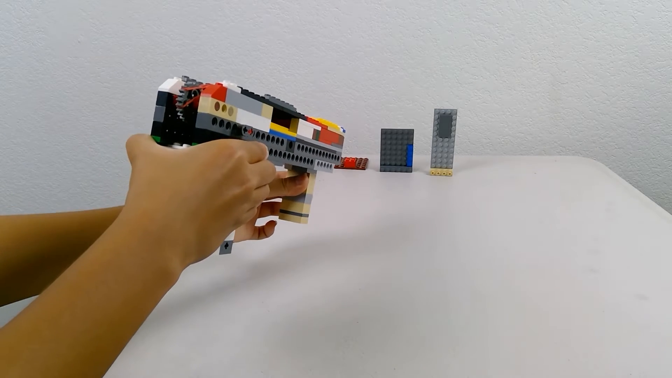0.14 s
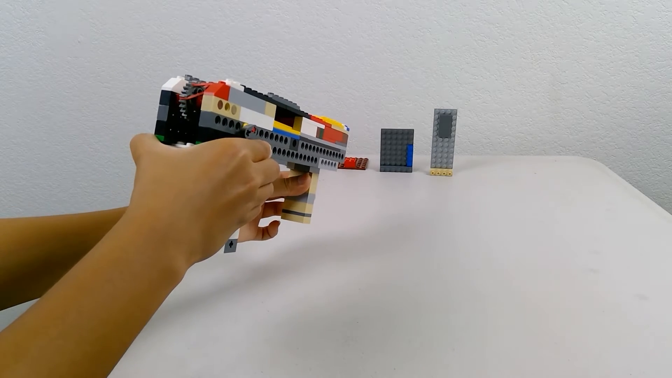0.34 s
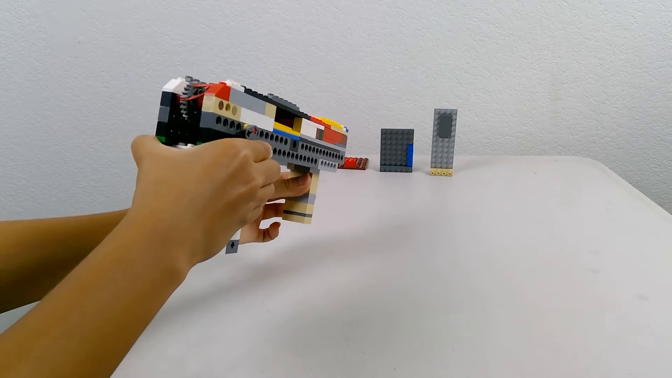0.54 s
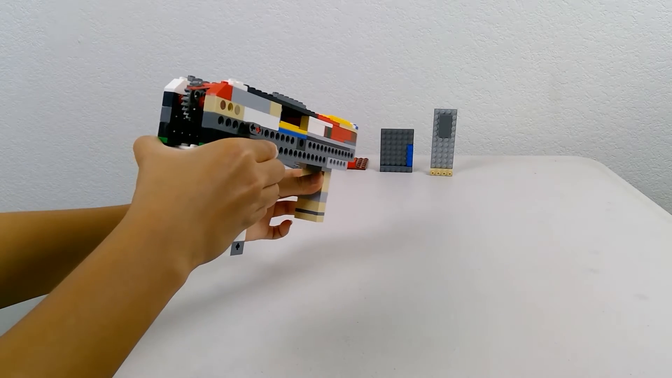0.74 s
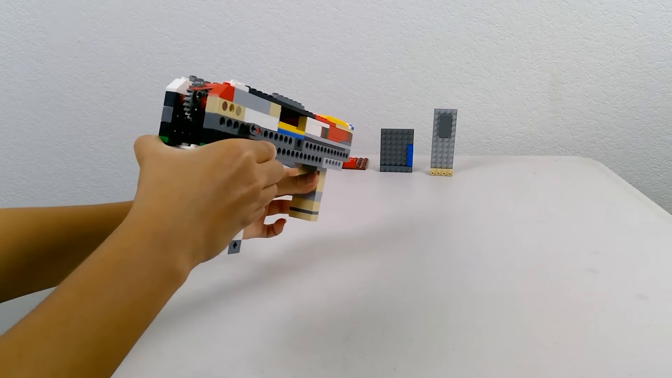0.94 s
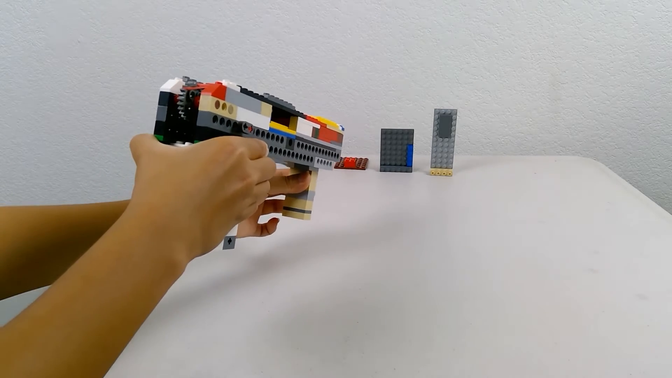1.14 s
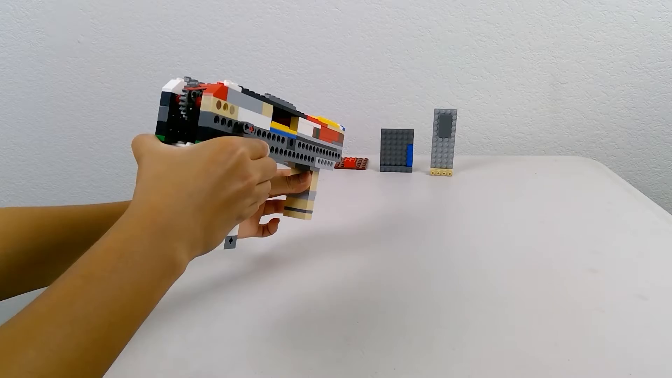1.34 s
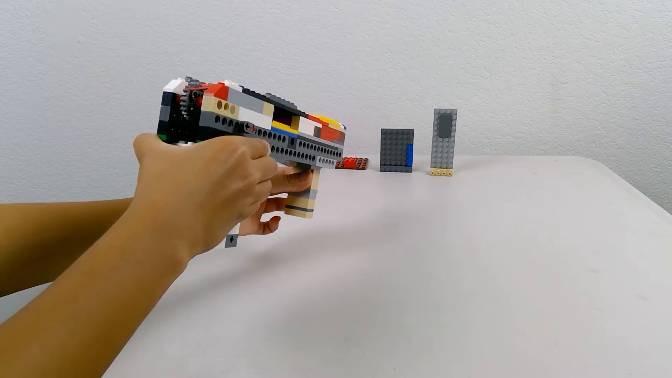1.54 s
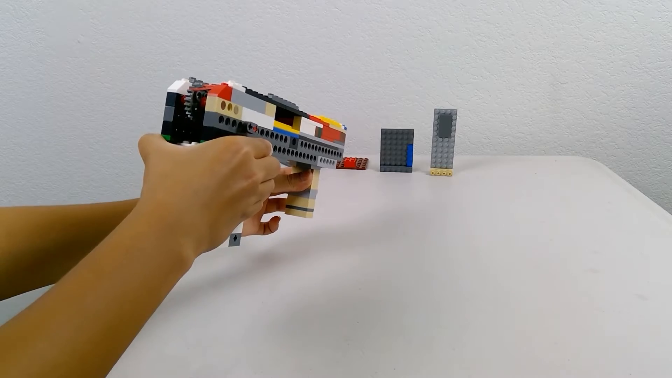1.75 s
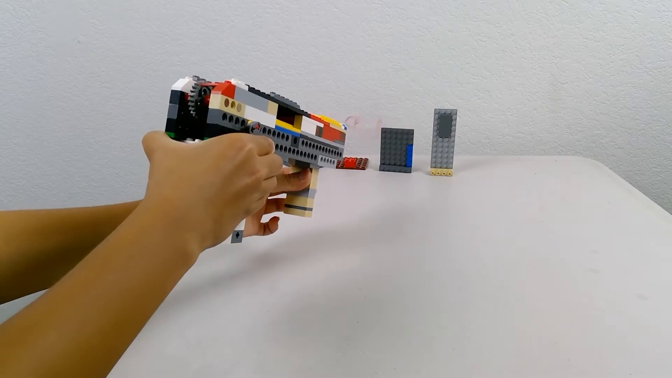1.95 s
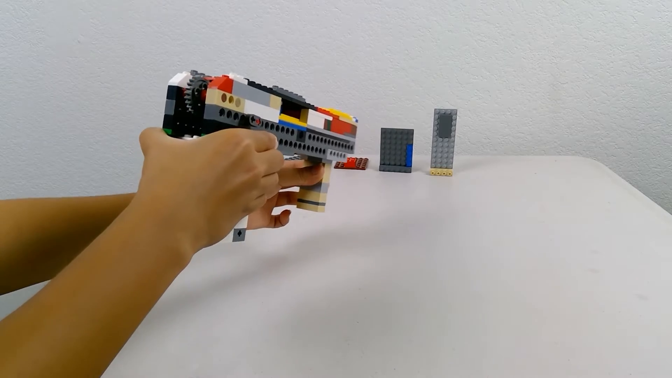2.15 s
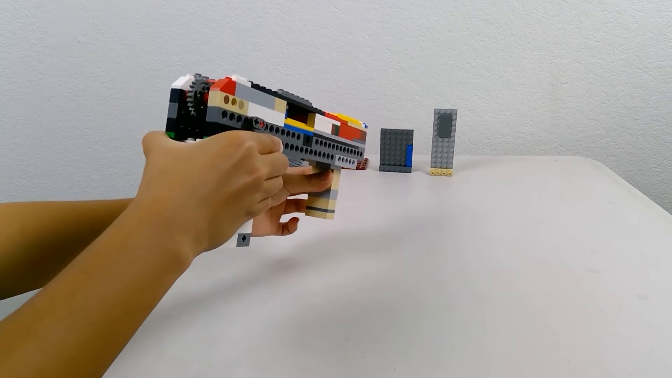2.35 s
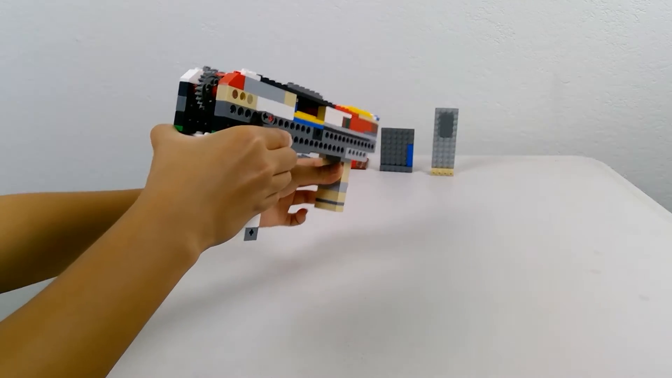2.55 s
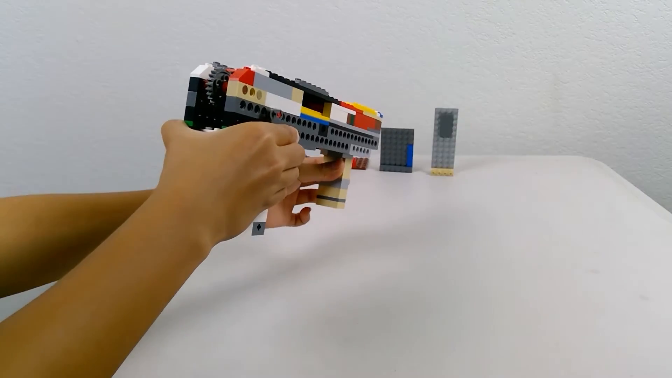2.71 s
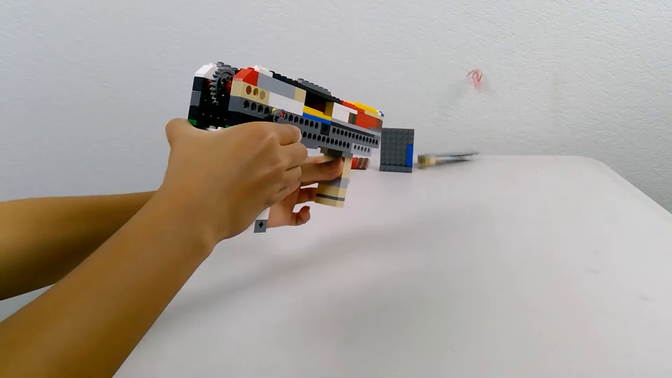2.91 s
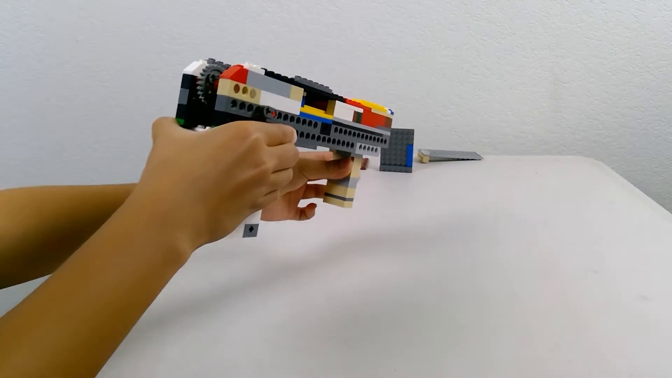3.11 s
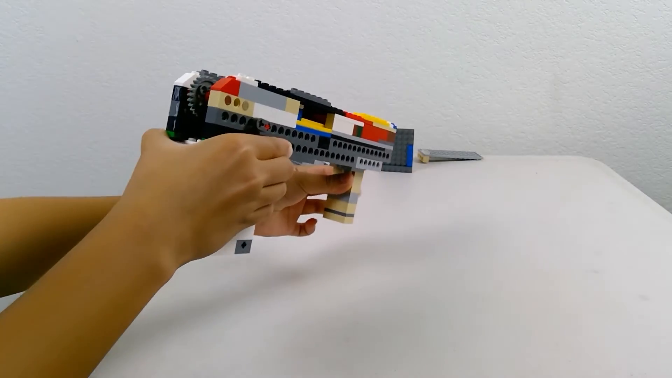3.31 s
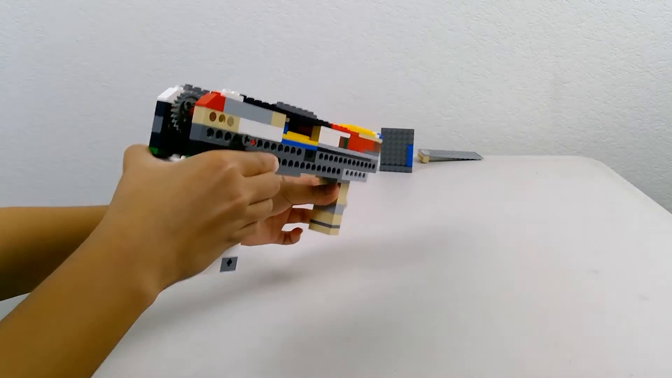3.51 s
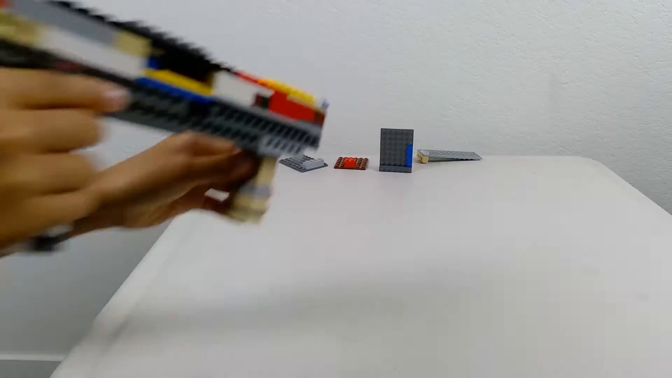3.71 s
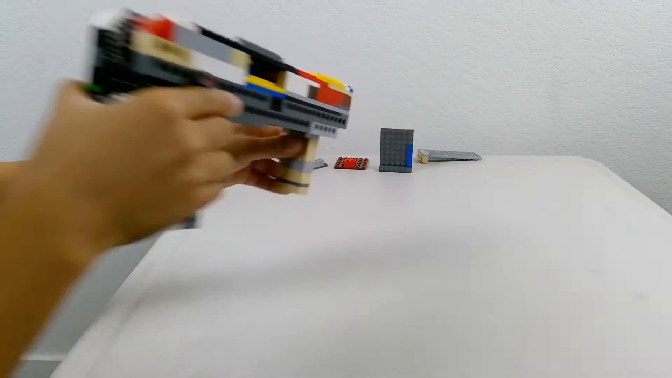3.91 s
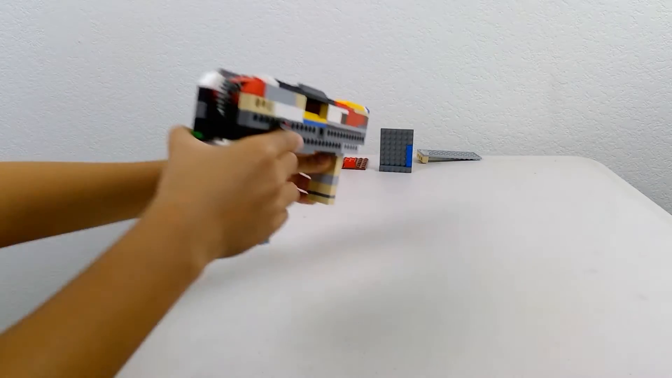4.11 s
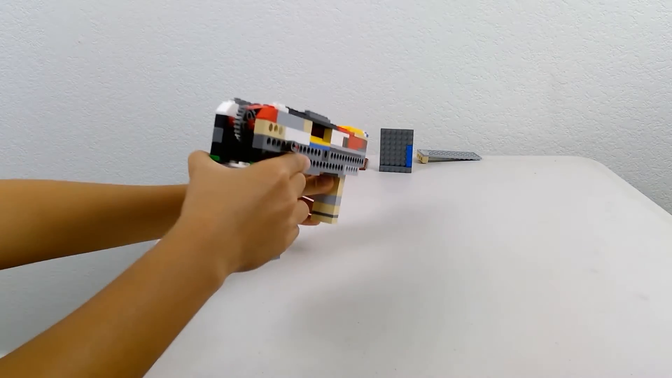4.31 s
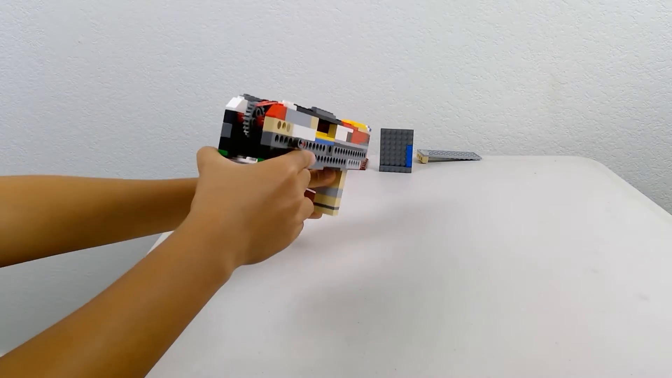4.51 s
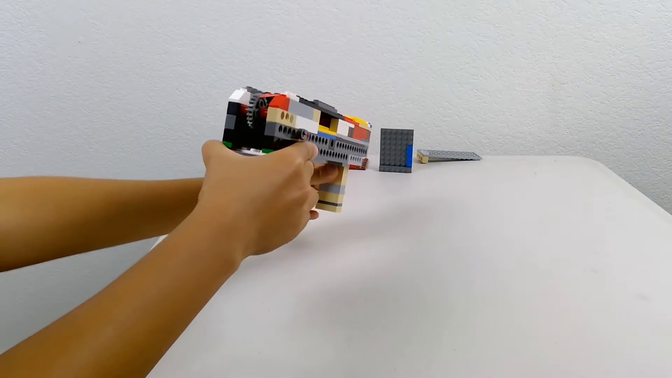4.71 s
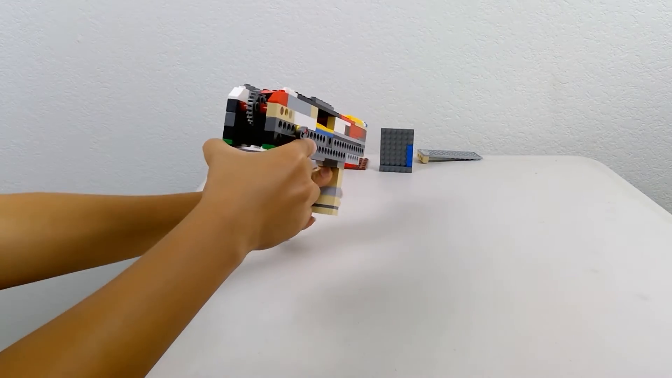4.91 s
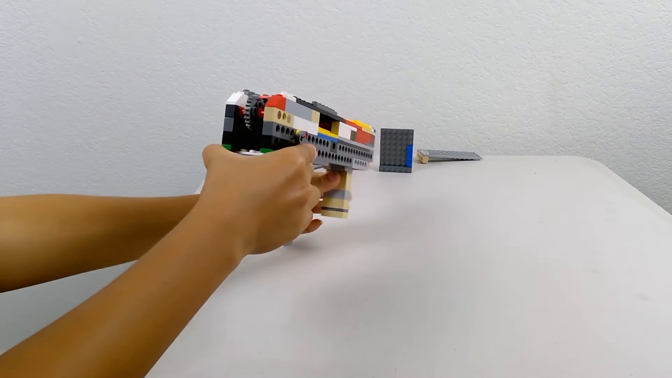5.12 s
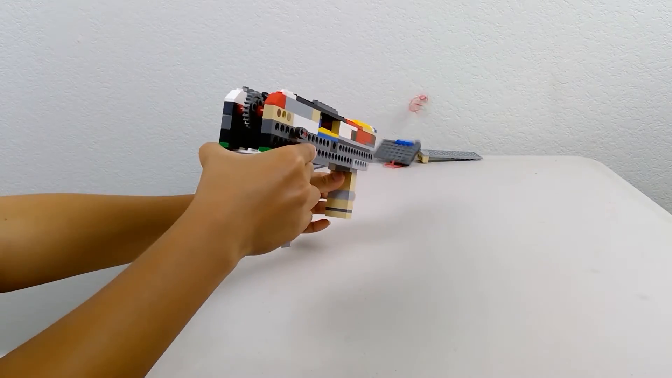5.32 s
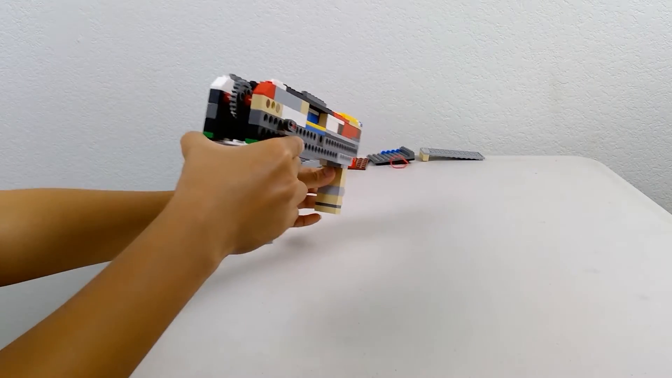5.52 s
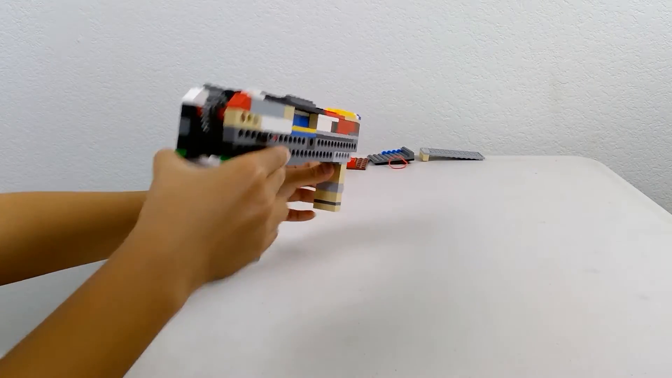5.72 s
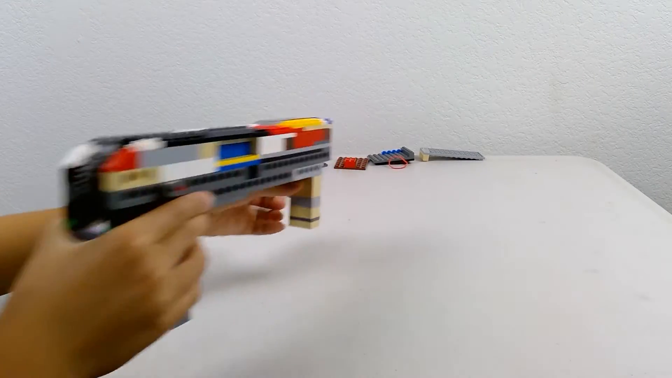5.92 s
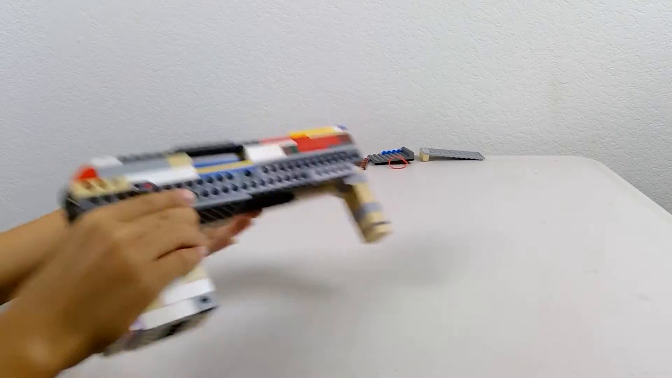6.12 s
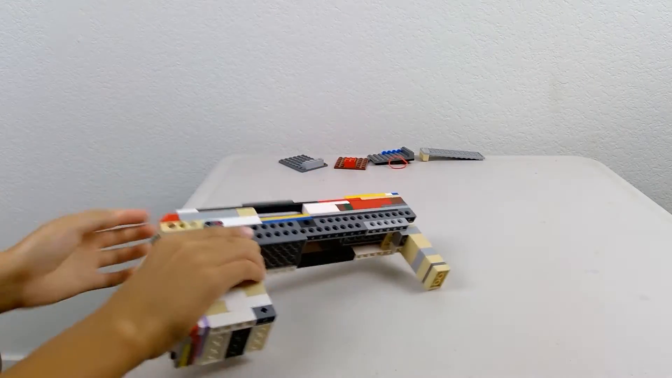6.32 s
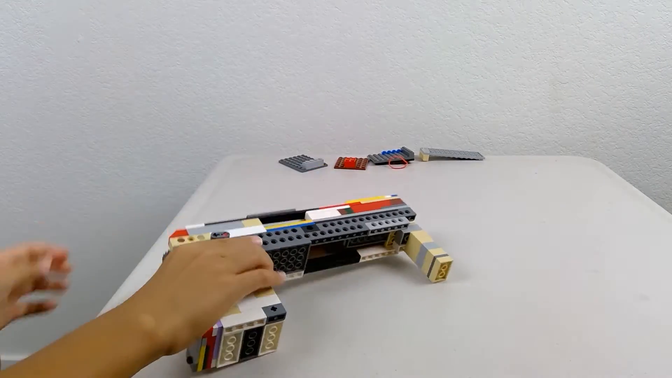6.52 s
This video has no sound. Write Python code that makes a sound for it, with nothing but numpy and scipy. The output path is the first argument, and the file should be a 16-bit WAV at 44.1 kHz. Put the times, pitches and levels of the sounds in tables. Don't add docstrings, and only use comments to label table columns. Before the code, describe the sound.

Dry, bright plastic snaps sit slightly right of the microphone, with short room echoes. Cocking clacks and trigger clicks lead to the loudest sound, a hard brick target hitting the tabletop and rattling to rest. Near silence follows with faint ticks, then two more clicks and a denser wobbling clatter. Finally there is a muted plastic thump as the toy is put down. Low rumble swells after the blows.

```python
import sys
import numpy as np
from scipy import signal
from scipy.fft import rfft, irfft
from scipy.io import wavfile

SR = 44100
rng = np.random.default_rng(int(sys.argv[2]) if len(sys.argv) > 2 else 0)


def ratio(d):
    e = np.asarray(d, float) / 20
    return 10 ** e


def inscribe(sig):
    pcm = np.round(np.clip(np.atleast_2d(sig).T, -1, 1) * 32767)
    wavfile.write(sys.argv[1], SR, pcm.astype(np.int16))


N = 288842
LEAD = SR // 50


def cut(x, hz, kind, order=4):
    return signal.sosfilt(signal.butter(order, hz, kind, fs=SR, output="sos"), x)


def band(x, lo_hz, hi_hz):
    y = cut(x, [lo_hz, min(hi_hz, 0.45 * SR)], "band", order=3)
    return y / np.std(y)


def colour(x, points, delay_s=0.0):
    hz = np.fft.rfftfreq(x.shape[-1], 1 / SR)
    point_hz, db = np.transpose(points)
    gain = ratio(np.interp(np.log(hz + 1), np.log(point_hz), db))
    delay = np.exp(-2j * np.pi * hz * delay_s)
    return irfft(rfft(x) * gain * delay, x.shape[-1])


def peak(pair, db):
    return pair * ratio(db) / np.max(np.abs(pair[0]))


def add(track, s, sound):
    i = int(s * SR) - LEAD
    track[..., i:i + sound.shape[-1]] += sound[..., :track.shape[-1] - i]


def opening(x):
    open_s, close_s = 0.065, 0.12
    follow = 0.87
    t = np.arange(SR) / SR
    memory = np.exp(-2 * t / close_s) * (1 - np.exp(-t / open_s)) ** 2
    power = np.abs(signal.fftconvolve(x ** 2, memory)[:N])
    return (power / power.max()) ** (follow / 2)


# (frequency [Hz], density [dB per Hz])
AIR_SPECTRUM = [(47, -40), (80, -6), (157, -13.5), (397, -16), (520, -23.5), (1970, -39.5), (10300, -61),
                (11500, -91)]
# (time [s], level [dB])
HUM_LEVEL = [(0, -62.5), (1.2, -71), (2.7, -70), (3.6, -60), (6.55, -59)]
# (time [s], level [dB], length [s])
SLEEVE_BRUSHES = [
    (2.03, -58.5, .08),
    (4.24, -69, 0.03),
]


def floor(near, far):
    mains_hz, hum_width_hz, boom_hz = 59, 7, 400
    t = np.arange(N) / SR
    held, struck = opening(near), opening(far)
    boom = opening(cut(far, boom_hz, "low"))
    noise = rng.standard_normal((5, N))
    sides = np.array([[1], [-1]])

    rumble = band(cut(noise[0] + 0.2 * sides * noise[1], 28, "high"), 31, 45)
    rumble_gain = ratio(-61.5) + ratio(-49.5) * held + ratio(-41.5) * struck

    waver = band(noise[2] + 0.14 * sides * noise[1], mains_hz - hum_width_hz, mains_hz + hum_width_hz)
    hum = 0.85 * np.sin(2 * np.pi * mains_hz * t) + 0.55 * waver
    hum_gain = ratio(np.interp(t, *np.transpose(HUM_LEVEL)))
    hum_gain = hum_gain + ratio(-59) * held + ratio(-49.5) * struck + ratio(-40.5) * boom

    air = colour(noise[3] + 0.23 * sides * noise[4], AIR_SPECTRUM)
    air_gain = ratio(-70.5)
    for s, db, length_s in SLEEVE_BRUSHES:
        air_gain = air_gain + ratio(db) * np.exp(-((t - s) / length_s) ** 2)
    return ratio(-5.5) * rumble_gain * rumble + ratio(-2.0) * hum_gain * hum + air_gain * air / np.std(air)


# (frequency [Hz], t60 [s], level [dB])
ROOM_OCTAVES = [(121.65, 0.67, -11.5), (251, 0.67, -13), (480, 0.53, -9.5), (1063, 0.31, -12),
                (1940, 0.39, -11.5), (3930, 0.48, -16), (6976, 0.44, -14.5), (14000, 0.29, -12.5)]


def room(x, build_s=0.0098):
    t = np.arange(int(0.8 * SR)) / SR
    sides = np.array([[1], [-1]])
    tail = 0
    for hz, t60, db in ROOM_OCTAVES:
        lo_hz, hi_hz = hz / 2 ** 0.5, hz * 2 ** 0.5
        mid = band(rng.standard_normal(len(t)), lo_hz, hi_hz)
        side = band(rng.standard_normal(len(t)), lo_hz, hi_hz)
        pair = mid + min(hz / 1100.0, 1) * side * sides
        tail = tail + ratio(db - 35.0) * np.sqrt(hz / 1000) * pair * np.exp(-np.log(1000) * t / t60)
    return signal.fftconvolve(x[None], tail * (1 - np.exp(-t / build_s)), axes=1)[:, :N]


# (frequency [Hz], level difference [dB])
PORT_SHADOW = [(100, -4), (300, -5.5), (700, -14), (2000, -7), (5000, -21.5), (12000, -21)]


def ports(x):
    left = colour(x, [(hz, db / 2) for hz, db in PORT_SHADOW], delay_s=3 / SR)
    right = colour(x, [(hz, -db / 2) for hz, db in PORT_SHADOW])
    return np.array([left, right])


# (time [s], peak level [dB])
TABLE_JOLTS = [
    (0.6873, -18.5),
    (2.1214, -35),
    (3.0094, -31.5),
    (4.905, -52.5),
]


def jolts():
    push_s, top_hz = 0.0024, 900
    out, t = np.zeros(N), np.arange(SR // 20) / SR
    push = np.diff(t * np.exp(-t / push_s))
    for s, db in TABLE_JOLTS:
        add(out, s + LEAD / SR, ratio(db) * push / push.max())
    return cut(out, top_hz, "low", order=1)


# (time [s], peak level [dB])
DRY_SNAPS = [
    (1.7866, -66),
    (3.6607, -63.5),
    (3.8194, -79.5),
    (4.7894, -77.5),
]


def snaps():
    out = np.zeros(N)
    for s, db in DRY_SNAPS:
        out[int(s * SR)] = ratio(db + 12.0)
    return cut(out, [600, 7000], "band", order=1)


# (time [s], peak level [dB], ring [Hz], t60 [s])
PIN_PINGS = [(0.2148, -57.5, 2213, 0.045), (2.7884, -63, 2652, .04), (2.8303, -51, 2050, .06),
             (2.7885, -60, 4100, .04), (4.873, -41, 4290, 0.032), (1.8392, -60, 1940, 0.076),
             (1.939, -35, 1635, 0.063), (5.9202, -70, 6000, .04), (5.9211, -74, 4460, 0.069),
             (6.051, -70, 6970, .06), (6.052, -72.5, 8800, .06), (6.083, -69.5, 1400, 0.088)]


def pings():
    rise_s, pan_db, room_db = 0.0054, -14.5, -9
    out, t = np.zeros(N), np.arange(SR // 10) / SR
    for s, db, hz, t60 in PIN_PINGS:
        fade = (1 - np.exp(-t / rise_s)) * np.exp(-np.log(1000) * t / t60)
        add(out, s + LEAD / SR, ratio(db) * fade / fade.max() * np.sin(2 * np.pi * hz * t))
    return out * ratio(np.array([[pan_db], [-pan_db], [2 * room_db]]) / 2)


def ring(modes, chance, detune=0.03, scatter_db=2.0):
    t = np.arange(SR // 20) / SR
    hz, db, t60 = np.transpose(modes)[:, :, None]
    k = len(modes)
    tuned_hz = hz * (1 + detune * chance[:k, None])
    weight = ratio(db + scatter_db * chance[k:2 * k, None])
    tones = np.sin(2 * np.pi * tuned_hz * t) * np.exp(-np.log(1000) * t / t60)
    sign = (-1.0) ** np.arange(k)[:, None]
    return np.sum(sign * weight * tones, axis=0)


def blow(db, hz, thud_db, crack_db, rattle_ms, body, base, ring_db, ring_t60, scrape_db):
    spread_s = 0.0015
    chance, size = rng.standard_normal(40), SR // 12
    t = (np.arange(size) - LEAD) / SR
    scrape = ratio(scrape_db) * np.exp(t / 0.004)
    rattle = np.exp(-t / max(rattle_ms / 1000, 1e-4))
    fade = np.where(t < 0, scrape, rattle)
    knocks = np.zeros((2, size))
    knocks[0] = rng.standard_normal(size) * np.where(rng.random(size) < 0.1, 1, 0.2) * fade
    knocks[0, LEAD] += 0.6
    knocks[1, LEAD] = np.sqrt(np.sum(knocks[0] ** 2))

    shell = cut(ring(body, chance), [1100, 7000], "band", order=2)
    shell = shell + ring([(hz, ring_db, ring_t60)], 0 * chance)
    shell = cut(shell, min(9000 * ratio(0.27 * crack_db), 15000), "low", order=1)
    brief = shell * np.exp(-np.arange(len(shell)) / SR / spread_s)
    shell = np.array([shell, brief * np.std(shell) / np.std(brief)])
    thud = cut(ring(base, chance[20:]), [110, 1250], "band", order=2)

    shell = signal.fftconvolve(knocks, shell, axes=1)[:, :size]
    thud = signal.fftconvolve(knocks, thud[None], axes=1)[:, :size]
    crack = cut(cut(knocks, 5500, "high", order=3), 8500, "low", order=1)
    return peak(shell, db) + peak(thud, db + thud_db) + peak(crack, db + crack_db)


# (time [s], peak level [dB], ring [Hz], left minus right [dB], crack [dB])
BRICK_TICKS = [(0.152, -74, 2148, -13, -34), (0.2134, -58.5, 2077, -20.5, 0), (1.8396, -59, 1680, -17, -7),
               (1.8389, -46, 2040, -10, -21.5), (2.7911, -62, 4010, -15, -40),
               (2.7891, -52.5, 2007, -7.5, -20), (4.2094, -67, 2334, -16, -25.5),
               (4.218, -67.5, 1900, -18, -27), (4.2401, -72.5, 2020, -9, -27.5),
               (5.906, -66, 3700, -21.5, -30), (5.922, -62, 8310, -36, -3), (6.0848, -66, 2378, -27, -16),
               (6.1185, -66.5, 3200, -30, -22), (6.0845, -60, 5300, -37, -22),
               (0.2155, -52.5, 3600, -30, 3)]
# (frequency [Hz], level [dB], t60 [s])
BRICK_MODES = [(1800, -17, 0.0073), (2240, -2.5, 0.044), (3500, -1.5, 0.081), (4440, -0.5, 0.02),
               (6000, -3, 0.015)]
# (frequency [Hz], level [dB], t60 [s])
HAND_MODES = [(146, -6.5, 0.0085), (302, -4.5, 0.016), (547, -5, 0.011), (900, 2, 0.0045)]


def ticks():
    out = np.zeros((3, N))
    for s, db, hz, pan_db, crack_db in BRICK_TICKS:
        tick = blow(db, hz, -31.5, crack_db, 3.2, BRICK_MODES, HAND_MODES,
                    ring_db=4.5, ring_t60=0.02, scrape_db=-16.5)
        add(out, s, tick[[0, 0, 1]] * ratio(np.array([[pan_db], [-pan_db], [0]]) / 2))
    dying = band(rng.standard_normal(N), 4060, 4550) * np.exp(-np.arange(N) / SR / 0.035)
    return out + ratio(-79.0) * dying


# (time [s], peak level [dB])
ROUND_BOUNCES = [
    (2.3795, -53.5),
    (2.43, -75.5),
    (2.4994, -70),
]
# (time [s], peak level [dB], loudest ring [Hz], thud [dB], crack [dB])
TALL_FALL = [
    (2.8978, -20, 1020, -6.5, -11.5),
    (3.0094, -6, 1818, -28.5, -12),
    (3.0254, -8, 883, -44.5, -15.5),
    (3.0424, -9.5, 3120, -21.5, -20.5),
    (3.0644, -20, 1510, -26, -22),
    (3.0993, -15.5, 1881, -13.5, -25.5),
    (3.1644, -14, 4370, -17.5, -16),
    (3.2107, -20, 2320, -11.5, -23.5),
]
TALL_ROCKS = [
    (3.27, -29, 3640, -6, -29),
    (3.335, -37.5, 4130, -22, -27),
]
SQUARE_TUMBLE = [(5.3068, -10, 880, -5.5, -29), (5.3229, -16.5, 2850, -1.5, -10.5),
                 (5.3604, -27.5, 1150, -25.5, -18.5), (5.4131, -15.5, 1500, -8, -19),
                 (5.4225, -25.5, 966, -18, -40), (5.4446, -25, 1024, -5, -12),
                 (5.4788, -16.5, 1250, -3, -33), (5.4861, -25.5, 1380, 1.5, -30.5),
                 (5.5223, -27, 1464, -8.5, -30), (5.5448, -24, 1587, -17, -37),
                 (5.5704, -21, 1654, -11, -10), (5.6221, -29.5, 1768, 0.5, -19),
                 (5.6689, -32.5, 1451, -7, -17), (5.7202, -41.5, 1299, 1, -32), (5.77, -68, 880, 10, -25.5)]
PISTOL_LAID = [
    (6.377, -14, 945, 0, -34.5),
    (6.3829, -20, 900, 2.5, -15.5),
    (6.3906, -22, 1908, 6, -42),
    (6.4322, -31.5, 480, 0, -40.5),
    (6.5454, -39, 521, 5.5, -11),
]
# (frequency [Hz], level [dB], t60 [s])
BRICK_TARGET_MODES = [(1250, 2.5, 0.0038), (1593, -1, 0.018), (1834, -3, 0.0046), (2285, -3.5, 0.0096),
                      (2870, -1.5, 0.0063), (3360, -2.5, 0.0074), (4070, -2.5, 0.0027),
                      (5176, -15.5, 0.018), (5770, -6, 0.0015)]
# (frequency [Hz], level [dB], t60 [s])
TABLE_TOP_MODES = [(131, -11.5, 0.027), (203, -10.5, 0.061), (302, -7.5, 0.035), (324, -9, 0.038),
                   (483, -1.5, 0.012), (643, -0.5, 0.0097), (703.7, -5, 0.043), (916, 3, 0.016),
                   (1180, -3.5, 0.024)]


def table():
    round_hz, round_thud_db, round_crack_db = 755.6, 13.5, -34
    bounces = [(s, db, round_hz, round_thud_db, round_crack_db) for s, db in ROUND_BOUNCES]
    all_modes, dull_modes = BRICK_TARGET_MODES, BRICK_TARGET_MODES[:6]
    top, narrow_top = TABLE_TOP_MODES, TABLE_TOP_MODES[2:-1]
    groups = [  # blows, rattle in ms, body, base
        (bounces, 6.1, all_modes, narrow_top),
        (TALL_FALL, 6.3, all_modes, top),
        (SQUARE_TUMBLE, 5.8, all_modes, top),
        (PISTOL_LAID, 6.1, dull_modes, top),
        (TALL_ROCKS, 6.3, all_modes, top),
    ]
    out = np.zeros((2, N))
    for rows, rattle_ms, body, base in groups:
        for s, *row in rows:
            add(out, s, blow(*row, rattle_ms, body, base, ring_db=-5.5, ring_t60=0.057, scrape_db=-35.5))
    return out


# (time [s], peak level [dB], loudest ring [Hz], thud [dB], crack [dB])
GUN_CLACKS = [(0.4217, -22.5, 2110, -18.5, -3.5), (0.6868, -13, 3480, -23, -2.5),
              (1.8744, -36.5, 4570, -22.5, -2.5), (1.9019, -15.5, 2100, -17.5, -5),
              (1.9375, -30.5, 1540, -9, -33), (2.1207, -13.5, 3920, -15.5, -1.5),
              (2.8302, -42.5, 2240, -24.5, -1.5), (2.8675, -27, 4060, -21.5, 0),
              (2.8724, -26.5, 2290, -18, -6), (4.8742, -34.5, 4000, -27, -3),
              (4.9048, -16.5, 4630, -19, -4.5), (5.2249, -20, 4750, -16.5, -2),
              (5.241, -21.5, 2700, -4, -12)]
SLIDE_STARTS = [
    (.408, -70, 2274, -16, -18),
    (0.664, -59, 3040, -12, -15.5),
    (0.684, -36.5, 3500, -10.5, -1.5),
    (2.0845, -57.5, 1300, 18.5, -14),
    (5.211, -45, 2040, -11, -21),
    (5.219, -31, 2176, -23, -4),
    (6.365, -69, 1460, 3.5, -24.5),
]
# (frequency [Hz], level [dB], t60 [s])
PISTOL_MODES = [(1300, -6, 0.0027), (1686, -2, 0.01), (2150, 3, 0.0031), (2700, 2.5, 0.0055),
                (3540, 3.5, 0.0041), (3900, 3, 0.0029), (4240, -2, 0.005), (5050, -2.5, 0.007),
                (5900, -3.5, 0.0033)]


def gun():
    out = np.zeros((2, N))
    for rows, rattle_ms in ((GUN_CLACKS, 5.5), (SLIDE_STARTS, 11)):
        for s, *row in rows:
            add(out, s, blow(*row, rattle_ms, PISTOL_MODES, HAND_MODES,
                             ring_db=-9.5, ring_t60=0.013, scrape_db=-23.0))
    return out


def scene():
    near, far, small = gun(), table(), ticks() + pings()
    echoes = room(near[1] + ratio(1.5) * far[1] + ratio(-4.0) * small[2])
    direct = ports(near[0] + far[0]) + small[:2]
    return direct + snaps() + jolts() + echoes + floor(near[0], far[0])


def low_pass(x):
    return signal.sosfilt(signal.butter(12, 16820, fs=SR, output="sos"), x)


def record(dry):
    soft = dry / (1 + (dry / 0.9) ** 4) ** 0.25
    mix = signal.sosfilt(signal.ellip(8, 0.2, 70, 15900, fs=SR, output="sos"), soft)
    return low_pass(mix)


dry = scene()
out = record(dry)
inscribe(out)
```